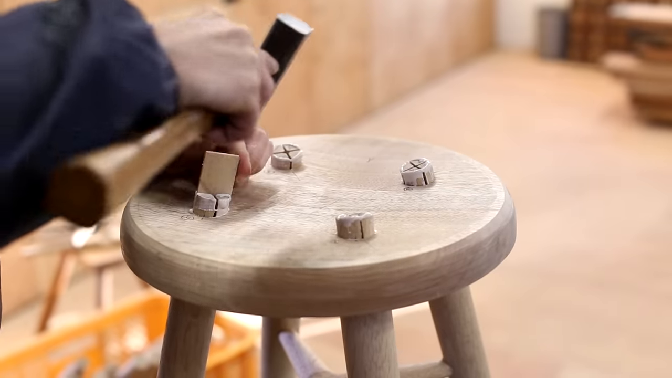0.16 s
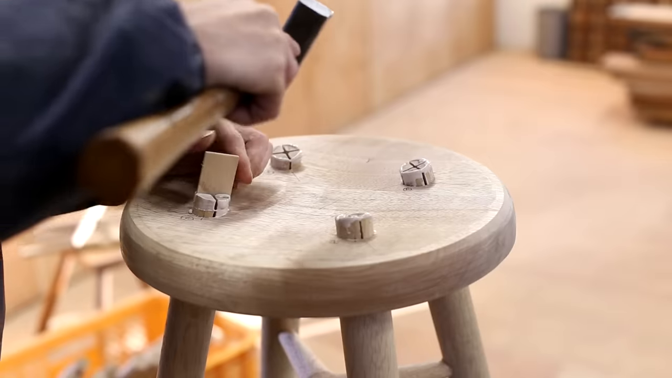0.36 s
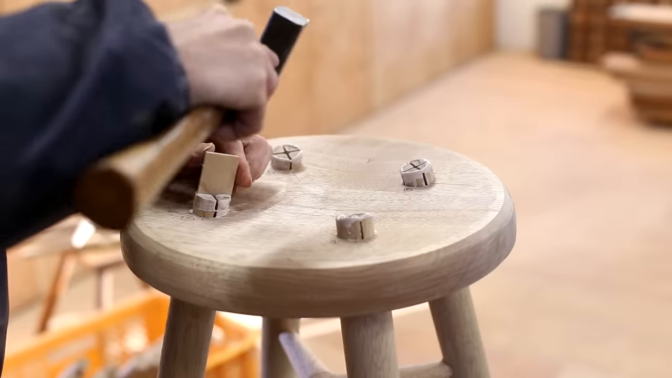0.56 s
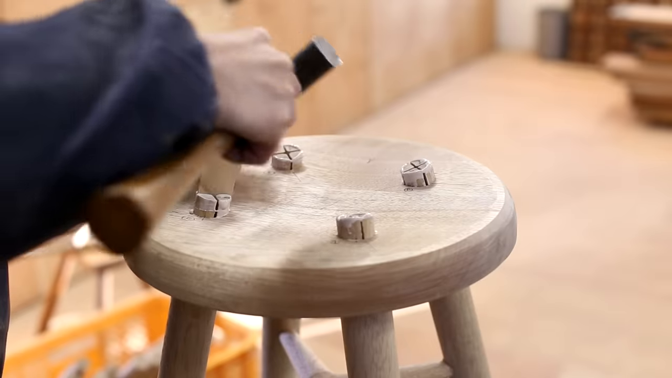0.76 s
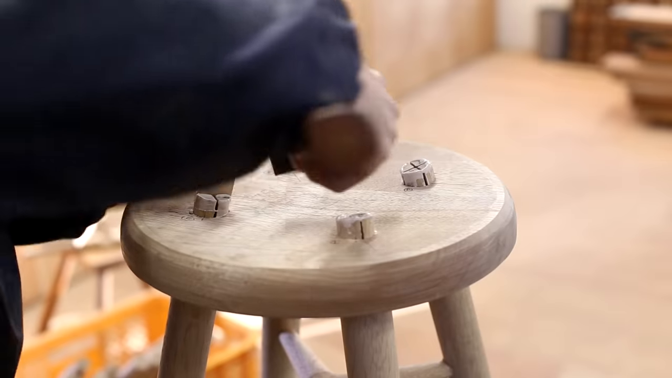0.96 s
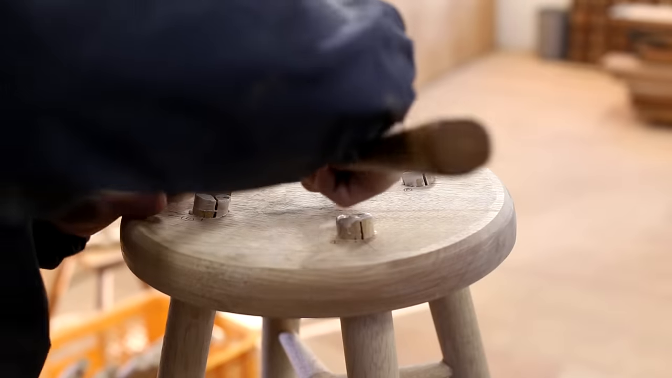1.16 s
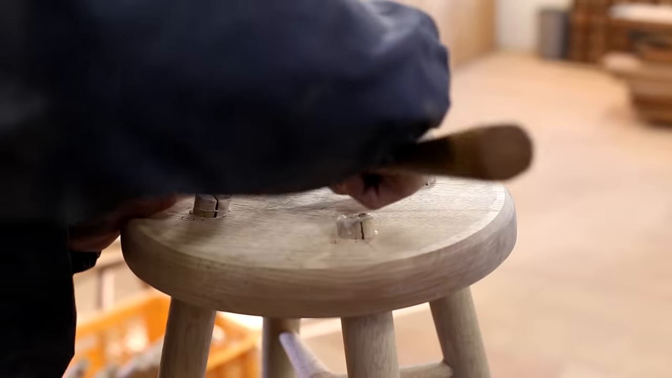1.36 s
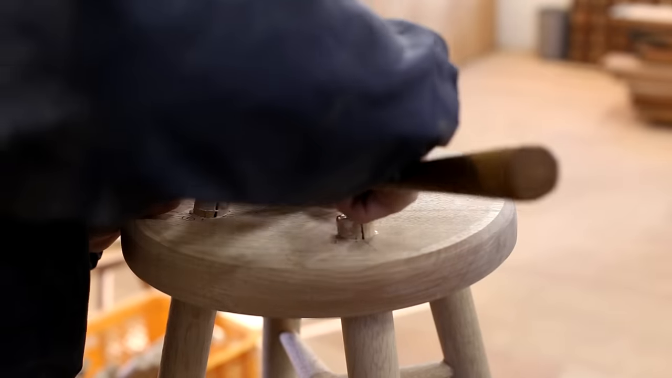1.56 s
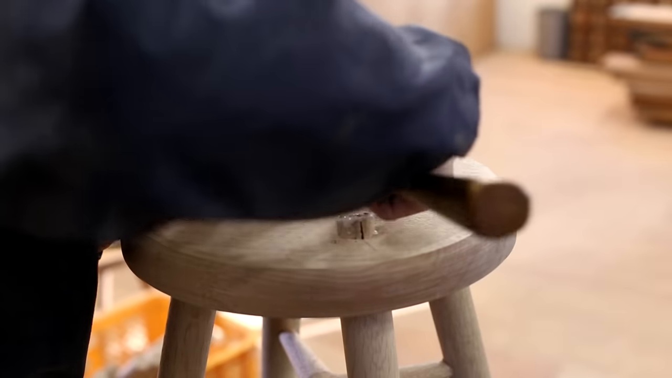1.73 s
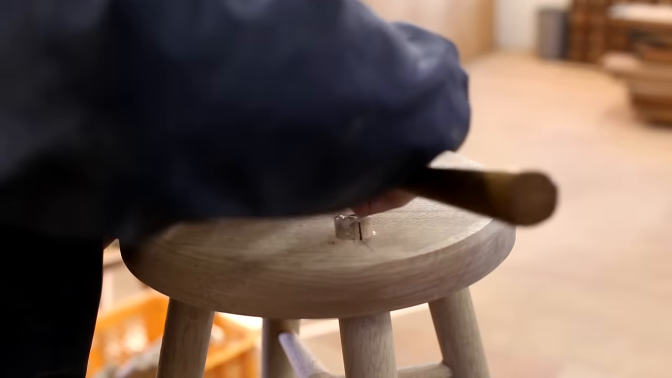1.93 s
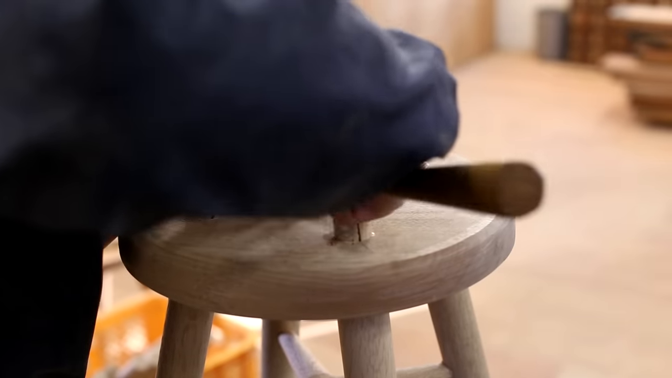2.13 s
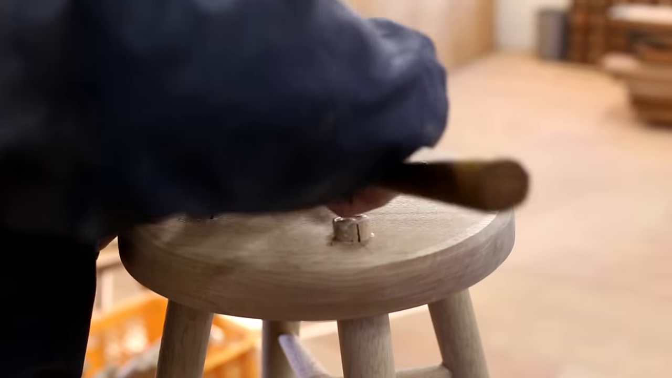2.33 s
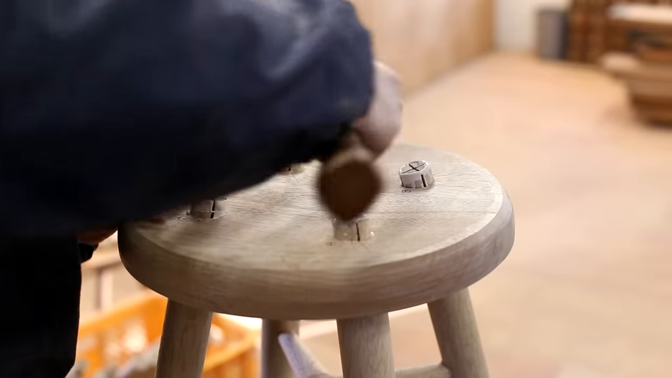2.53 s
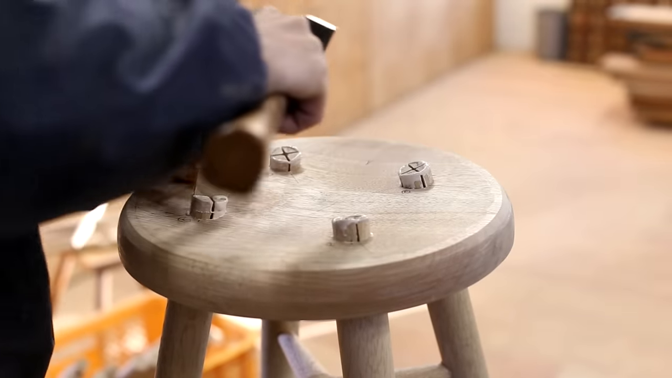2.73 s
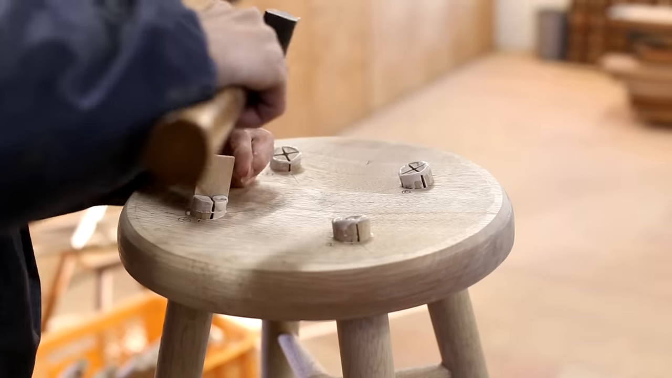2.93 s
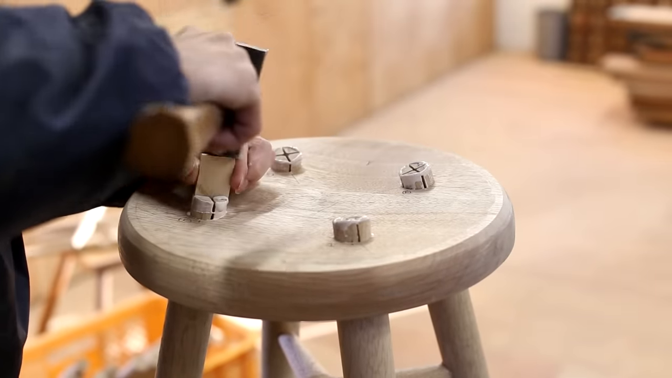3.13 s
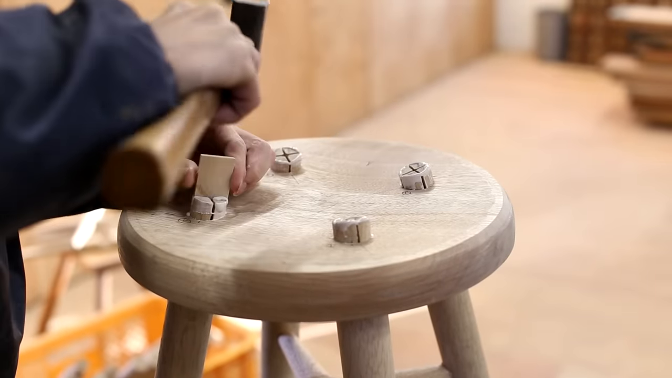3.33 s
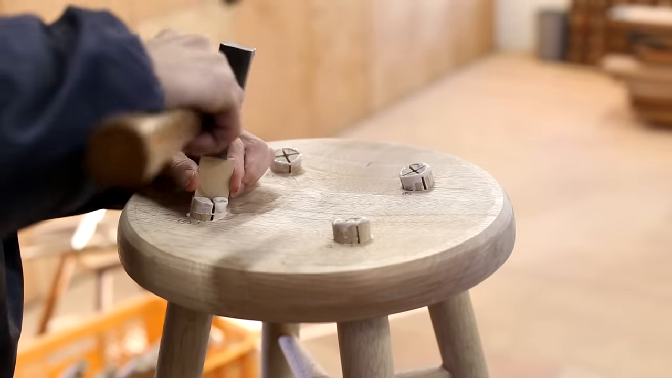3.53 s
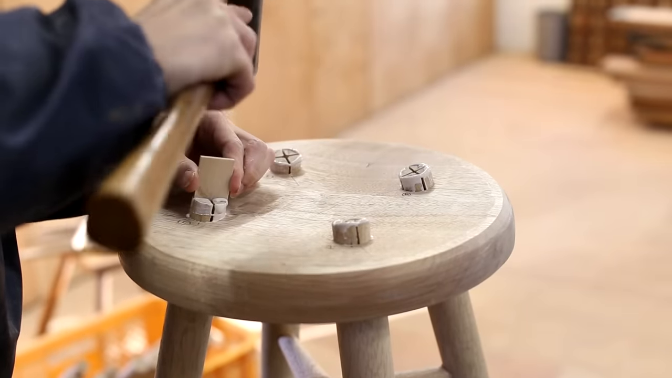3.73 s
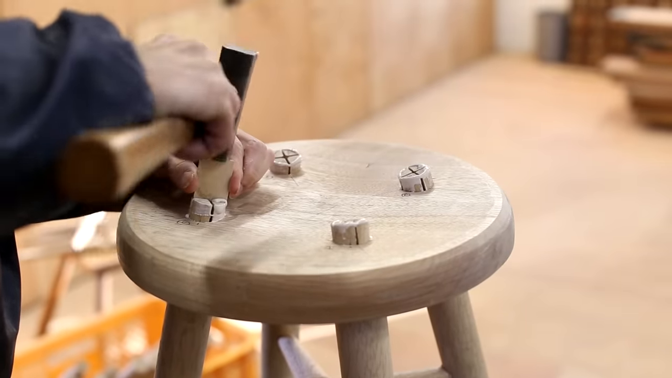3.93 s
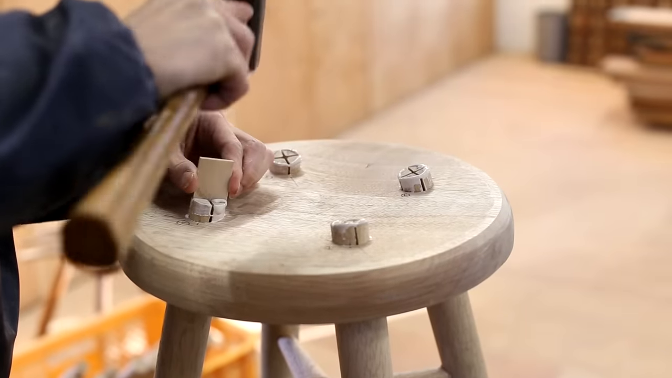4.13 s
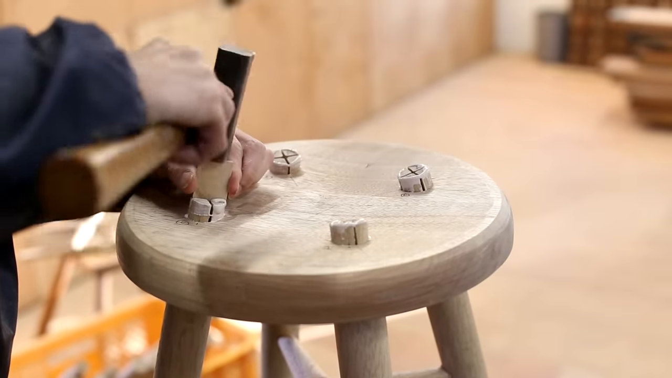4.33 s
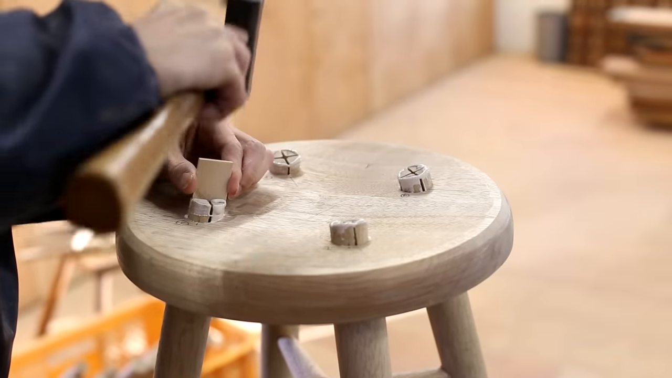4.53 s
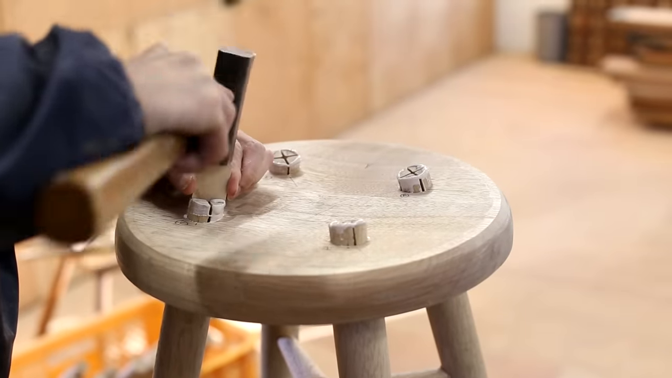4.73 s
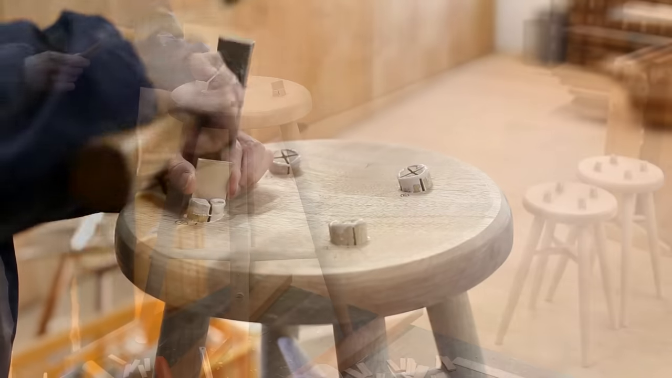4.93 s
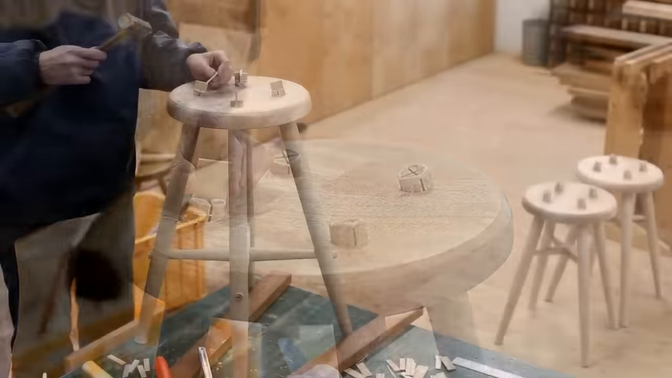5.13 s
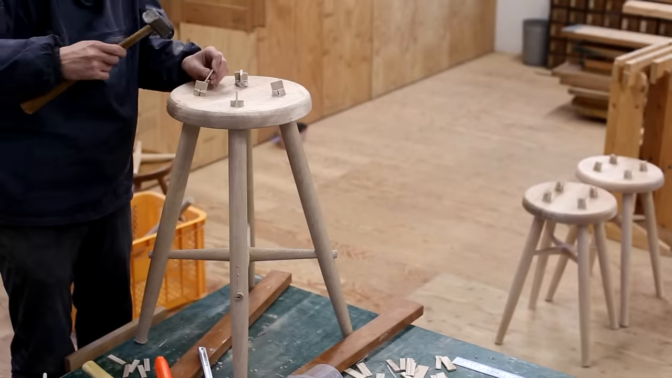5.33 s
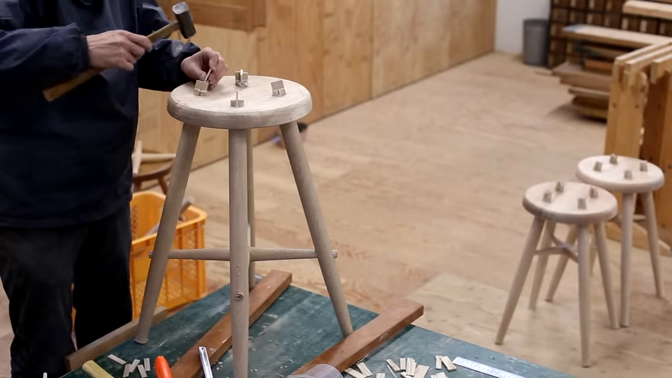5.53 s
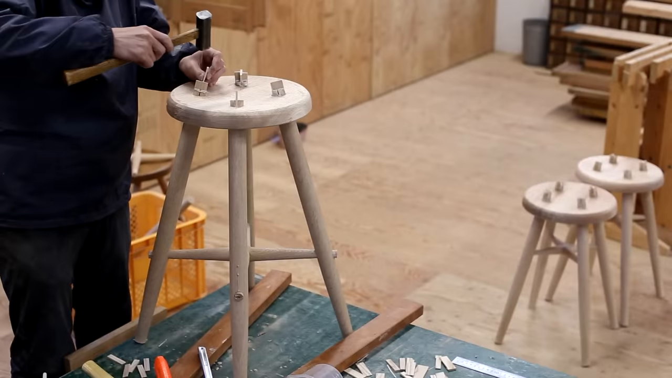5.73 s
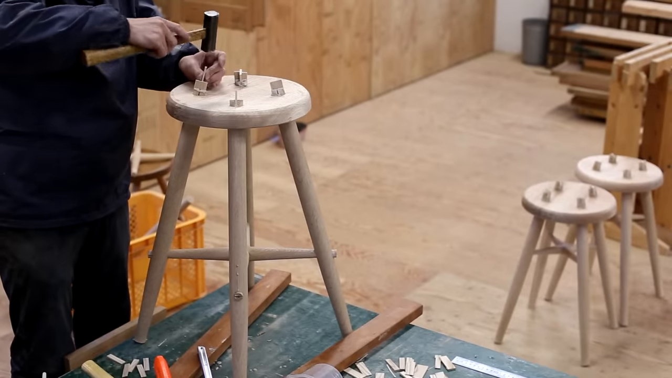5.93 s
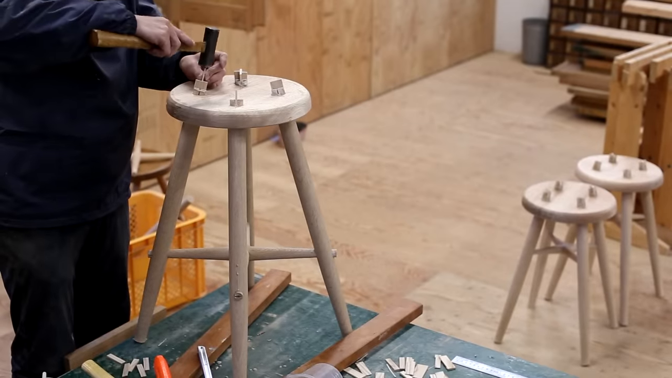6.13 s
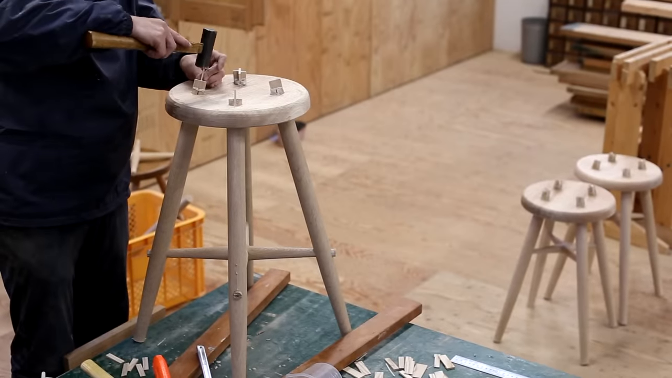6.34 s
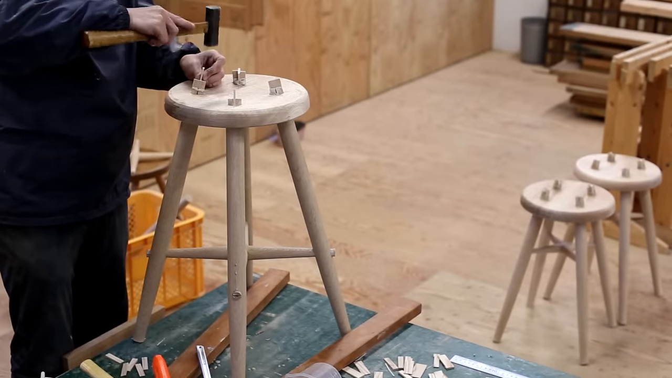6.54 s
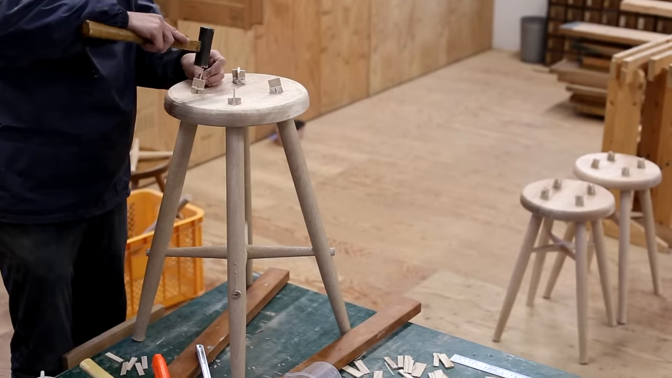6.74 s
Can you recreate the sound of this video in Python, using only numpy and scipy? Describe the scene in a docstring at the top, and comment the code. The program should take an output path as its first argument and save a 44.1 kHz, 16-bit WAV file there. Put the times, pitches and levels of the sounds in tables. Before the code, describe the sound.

In a live workshop, a hammer gives light hollow taps to wooden wedges, then hard spaced cracks on a low stool, then three duller knocks on a taller stool.

```python
"""The last ring of a hard blow dies away in a live workshop, then come faint touches, light taps and hard blows.
A steel hammer drives wooden wedges into a low stool's leg ends, and the sound cross-fades to a taller stool.
Each blow is a set of damped modes, noise bursts for crack and grain, and a room tail with one wall echo.
Filtered noise makes the air and the sleeve's swish; short bright bursts are wedges slipping and handling ticks.
The microphone chain cuts rumble, turns its gain down after loud sound and rounds off the peaks that slip past."""
import sys
import numpy as np
from scipy import signal
from scipy.fft import rfft, irfft, next_fast_len
from scipy.io import wavfile

SR = 44100
rng = np.random.default_rng(int(sys.argv[2]) if len(sys.argv) > 2 else 0)


def write(x):
    x = np.atleast_2d(x).T
    wavfile.write(sys.argv[1], SR, np.round(np.clip(x, -1, 1) * 32767).astype(np.int16))


N = 303849
RING_SIZE = 2 ** 15  # samples that each impact may ring
RING_TIME = np.arange(RING_SIZE, dtype='f') / SR  # s


def amp(db):
    """Decibels as an amplitude factor."""
    return 10 ** (np.asarray(db) / 20)


def decay(t60):
    """A fall of 60 dB in t60 seconds; one row for each t60."""
    rate = np.asarray(np.log(1000) / t60, 'f')[..., None]
    return np.exp(np.maximum(-rate * RING_TIME, -20))


def rise(time_constant):
    """An exponential build-up from nothing towards 1; time constant in seconds."""
    return 1 - decay(time_constant * np.log(1000))


def cut(x, hz, kind, order=2):
    """A causal low-pass or high-pass."""
    cutoff = min(hz, SR / 2 - 1)
    return signal.sosfilt(signal.butter(order, cutoff, kind, fs=SR, output='sos'), x)


def add(track, s, sound):
    """Mix a sound into the track from time s on; what falls outside the track is dropped."""
    start = round(s * SR)
    part = sound[max(-start, 0):N - start]
    track[max(start, 0):][:len(part)] += part


def hiss(spectrum):
    """Steady noise of rms 1 with the given colour."""
    hz, db = np.transpose(spectrum)
    size = next_fast_len(N)
    log_hz = np.log(np.fft.rfftfreq(size, 1 / SR) + 1)
    gain = amp(np.interp(log_hz, np.log(hz), db))
    x = irfft(rfft(rng.standard_normal(size)) * gain, size)[:N]
    return x / x.std()


def banded_noise(centres):
    """White noise split into overlapping bands, one row per band."""
    log_hz = np.log(np.fft.rfftfreq(RING_SIZE, 1 / SR) + 1)
    shares = np.array([np.interp(log_hz, np.log(centres), peak) for peak in np.eye(len(centres))], 'f')
    return irfft(rfft(rng.standard_normal(RING_SIZE, dtype='f')) * shares)


# Colour of the air around each stool. Each row: frequency in Hz, relative noise density in dB per Hz.
LOW_STOOL_AIR = [(20, 9.5), (40, -4), (150, 7), (300, -1), (700, -16.5), (1600, -11.5), (3000, -18.5),
                 (6000, -37), (15000, -30.5)]
TALL_STOOL_AIR = [(15, -23), (25, -9), (123, -10.5), (153, -2), (185, -8.5), (317, -14.5), (575, -12),
                  (1890, -13), (2160, -11.5), (5430, -24.5), (7920, -25), (16000, -27.5)]


def workshop_air(colour, level_db):
    """The steady air at the microphone: coloured noise at one level."""
    return amp(level_db) * hiss(colour)


# The live workshop's diffuse tail. Each row: frequency in Hz, t60 in seconds, relative level in dB.
ROOM = [(59.45, 1, -1.5), (121, 0.45, -0.5), (220, 0.54, 2.5), (485, 0.97, 0), (1100, 0.94, -2),
        (2280, 0.75, -1.5), (4300, 0.63, -7), (5600, 0.36, -12.5), (7440, 0.26, -9.5), (14390, 0.28, -13)]


def reverberation(hz, build_up=0.0043):
    """The envelope of the room's answer to a click in each band: a quick build-up, then a decay."""
    room_hz, t60, db = np.transpose(ROOM)
    t60, db = (np.interp(np.log(hz), np.log(room_hz), column) for column in (t60, db))
    energy = t60 * SR / (2 * np.log(1000))
    return (amp(db) / np.sqrt(energy)).astype('f')[:, None] * decay(t60) * rise(build_up)


def workshop(x, wet_db):
    """A ringing sound together with the room's answer: convolution with a decaying noise tail."""
    hz = [row[0] for row in ROOM]
    tail = (reverberation(hz) * banded_noise(hz)).sum(0)
    return x + amp(wet_db) * signal.fftconvolve(x, tail)[:RING_SIZE]


def wall_echo(x, echo_db=-17, dull_hz=4000):
    """The nearest wall returns one dull copy, late by its longer path to the microphone."""
    delay = round(.0215 * SR)  # 21.5 ms
    late = np.pad(x, (delay, 0))[:len(x)]
    return x + amp(echo_db) * cut(late, dull_hz, 'lowpass')


def swish(start, length):
    """The envelope of one arm movement: attack, hold, release."""
    attack_s, release_s = 0.042, 0.15  # the cloth speeds up, comes to rest
    t = np.arange(N) / SR - start
    return np.clip(np.minimum(t / attack_s, 1 - (t - length) / release_s), 0, 1)


# Arm movements that rub the sleeve. Each row: start in seconds, length in seconds, level in dB.
SWISHES = [(0.746, 2.31, -63), (0.938, 0.21, -57.5), (2.638, 0.25, -60.5)]
# Colour of the jacket cloth. Each row: frequency in Hz, relative noise density in dB per Hz.
CLOTH = [(180, -29), (300, -2.5), (455, -2), (1320, 2.5), (1720, -0.5), (3080, 0), (5430, -8.5),
         (10400, -9.5), (16000, -20.5)]


def sleeve(rustle_db=-68.5, flutter_db=1):
    """Jacket cloth slides over itself with each arm movement, catching a little; rustle_db holds between them."""
    count = N // 600  # one random catch about every 600 samples
    catches = np.interp(np.arange(N), np.linspace(0, N, count), rng.standard_normal(count))
    power = amp(rustle_db) ** 2 + sum((amp(db) * swish(s, length)) ** 2 for s, length, db in SWISHES)
    return np.sqrt(power) * amp(flutter_db * catches) * hiss(CLOTH)


def burst(bands, wet_db):
    """A noisy impact: each band dies at its own speed and hands its energy to the room's diffuse tail."""
    hz, t60, db = np.transpose(bands)
    direct = decay(t60) ** 2
    diffuse = float(amp(wet_db)) ** 2 * direct.sum(1, keepdims=True) * reverberation(hz) ** 2
    return amp(db).astype('f') @ (np.sqrt(direct + diffuse) * banded_noise(hz))


# Short bright rasps as wedges slip under blows, and faint ticks of handling between them.
# Each row: time in seconds, level in dB.
RASPS_AND_TICKS = [(.817, -50), (1.9362, -14.5), (2.2092, -22.5), (2.429, -36.5), (3.052, -51.5),
                   (3.412, -54), (6.198, -29.5), (6.456, -21), (6.768, -14)]
# Colour of these rasps and ticks. Each row: frequency in Hz, t60 in seconds, relative density in dB per Hz.
RASP_BANDS = [(2040, .03, -20), (4620, .03, -17), (5750, 0.013, 5), (7630, 0.017, 4), (9200, 0.026, -10),
              (15000, .03, -40)]


def rasps_and_ticks(start, end, wet_db=3):
    """Bright rasps of slipping wedges and faint handling ticks between two times: short noise bursts with room."""
    out = np.zeros(N)
    for s, db in RASPS_AND_TICKS:
        if start <= s < end:
            add(out, s, amp(db) * burst(RASP_BANDS, wet_db))
    return out


def mode(hz, t60, rise_cycles=0.7, scatter_db=1):
    """One damped mode; low modes take longer to build up, and its level scatters at random."""
    phase = 2 * np.pi * (float(hz) * RING_TIME + rng.random())
    return amp(scatter_db * rng.normal()) * (rise(rise_cycles / hz) * decay(t60) * np.sin(phase))


# A wedge not yet tight. Each row: frequency in Hz, t60 in seconds, relative level in dB.
WEDGE = [(1475, 0.06, -5.5), (1520.5, 0.058, -8.5), (1522, 0.028, -16.5)]


def wedge_ring(level_db, wet_db=-7):
    """A loose wedge rings in a few slowly built modes, heard with the room."""
    ring = sum(amp(db) * mode(hz, t60, rise_cycles=10.0) for hz, t60, db in WEDGE)
    return workshop(amp(level_db) * ring, wet_db)


# Steel meeting end grain. Each row: frequency in Hz, t60 in seconds, relative density in dB per Hz.
CRACK = [(250, 0.0091, 2), (1213, 0.018, -0.5), (1780, 0.02, -13.5), (2650, 0.0066, -4), (3160, 0.027, 1.5),
         (3700, 0.059, -5), (4334, .018, 2.5), (6600, 0.0073, 1.5), (10640, 0.026, -7.5),
         (14900, 0.012, -19.5)]


def steel_crack(strength_db, contact_hz, wet_db):
    """The noisy crack of steel on wood, weaker as the contact softens."""
    hard_contact_hz, db_per_octave = 8600, 10.5  # a square hit; crack lost below it
    crack_db = strength_db + db_per_octave * np.log2(contact_hz / hard_contact_hz)
    return amp(crack_db) * burst(CRACK, wet_db)


def struck_at(place, table):
    """Where the seat is struck decides how strongly each mode answers: rows (Hz, t60 s, dB)."""
    return [(hz, t60, dbs[0] + place * (dbs[-1] - dbs[0])) for hz, t60, *dbs in table]


def seat_and_legs(modes, knock_db):
    """The struck stool's ring: the seat follows the knock, the low modes the legs' thump on the bench."""
    thump_db = -3 + 0.75 * knock_db  # the thump grows more slowly than the blow
    legs_top_hz = 350
    ring = 0
    for hz, t60, db in modes:
        strength_db = thump_db if hz < legs_top_hz else knock_db
        ring = ring + amp(db + strength_db) * mode(hz, t60)
    return ring


def hammering(blows, modes, grain, near_wet_db, spread_time, hard_crack_db,
              far_wet_db=-2.5, ring_wet_db=-2, grain_db=-1):
    """Each contact cracks on the wedge, rings the seat and thumps the legs on the bench."""
    out = np.zeros(N)
    for s, knock_db, contact_hz, wedge_db, place in blows:
        place = np.clip(place, 0, 1)
        wet_db = near_wet_db + place * (far_wet_db - near_wet_db)
        ring = seat_and_legs(struck_at(place, modes), knock_db)
        wood = workshop(ring, wet_db + ring_wet_db)
        wood += amp(knock_db + grain_db) * burst(struck_at(place, grain), wet_db)
        # the blow takes a moment to spread through the stool; a soft contact leaves the high modes quiet
        wood = cut(wood * rise(spread_time), contact_hz, 'lowpass', order=3)
        crack = steel_crack(knock_db + hard_crack_db, contact_hz, wet_db)
        add(out, s, wood + wedge_ring(wedge_db) + crack)
    return wall_echo(cut(out, 85, 'highpass', order=3))


# A faint bump, then blows on the tall stool. Each row: start in seconds, strength in dB.
TALL_CONTACTS = [(5.716, -54), (6.198, -13.5), (6.456, -4.5), (6.768, -1)]
# Its clear modes. Each row: frequency in Hz, t60 in seconds, level in dB relative to the blow.
TALL_MODES = [(114, 0.58, -25), (137.3, 0.069, -4.5), (210.3, 0.13, -11.5), (339.8, 0.18, -18.5),
              (464, 0.74, -35.5), (636, 0.043, -19), (775, 0.041, -18), (1374, 0.046, -12),
              (2000, 0.041, -22), (2760, 0.18, -29.5), (3190, 0.088, -28)]
# Its crowd of weak, close modes. Each row: frequency in Hz, t60 in seconds, relative density in dB per Hz.
TALL_GRAIN = [(151, 0.016, 6.5), (595, 0.22, -11), (1050, 0.091, -12.5), (1540, 0.11, -13.5),
              (2410, 0.089, -19), (3070, 0.11, -6), (3260, 0.069, -30), (3580, 0.074, -5.5),
              (4700, 0.017, -10.5), (15500, 0.084, -12)]


def tall_stool():
    """The taller stool, bumped then hammered; contact and place stay the same throughout."""
    contact_hz, wedge_db = 6540, -32  # contact cut-off; wedge ring relative to the strength
    blows = [(s, db, contact_hz, db + wedge_db, 0) for s, db in TALL_CONTACTS]
    return hammering(blows, TALL_MODES, TALL_GRAIN, near_wet_db=0.06, spread_time=0.004,
                     hard_crack_db=-11.5, ring_wet_db=-7.5)


# The low stool: a hard blow's end, light touches, taps on the far wedge, a dull blow, then hard blows
# nearer the middle. Each row: start in seconds, strength in dB, contact cut-off in Hz, wedge ring in dB,
# place from 0 (near wedge) to 1 (far wedge).
LOW_CONTACTS = [(-.085, 2.5, 9600, -27, 0.68), (.583, -57, 2500, -37, 0.86), (.653, -64, 2500, -43, .7),
                (.817, -47, 3520, -60, 0.82), (1.0, -55, 500, -42, 0.63), (1.306, -17.5, 2330, -6.5, 0.99),
                (1.666, -9, 2600, -5, 0.91), (1.936, -4.5, 3060, -10, .89), (2.209, -6, 2960, -13, 0.94),
                (2.430, -7.5, 2300, -10, 1), (3.183, -3, 1300, -22, 0.94), (3.5565, -2, 7500, -16.5, 0.18),
                (3.944, -2.5, 8500, -19, 0.44), (4.3735, -4.5, 9150, -30, 0.49),
                (4.8395, -6, 9430, -29, 0.46), (5.312, -1, 9200, -20, .6)]
# Its clear modes; the last four rows, near 3 kHz and 4-4.5 kHz, ring in the steel hammer head. Each row:
# frequency in Hz, t60 in seconds, dB relative to a near blow, to a far blow.
LOW_MODES = [(104.5, 0.46, -29, -23.5), (156.3, .2, -29, -26.5), (230.2, 0.15, -31, -15),
             (301, 0.092, -25, -10.5), (357, 0.19, -22, -26), (426, 0.12, -21.5, -23.5),
             (501.4, 0.11, -18, -24.5), (555.2, 0.19, -20.5, -28), (668, 0.085, -23, -18),
             (766, 0.088, -13.5, -23.5), (904.4, 0.16, -11.5, -20), (1130, 0.031, -20, -38),
             (1234, 0.12, -25, -28.5), (1357, 0.18, -14, -29.5), (1475, 0.12, -22, -29.5),
             (1740, 0.098, -12.5, -24.5), (1821, 0.13, -37.5, -17), (2309, 0.14, -42, -27),
             (2990, 0.24, -37.5, -39.5), (2970, 0.11, -27, -42.5), (4050, 0.054, -17.5, -40),
             (4450, 0.073, -25.5, -40)]
# Its weak, close modes. Each row: frequency in Hz, t60 in seconds, relative dB per Hz struck near, struck far.
LOW_GRAIN = [(166, 0.17, -19, -0.5), (261, 0.073, 8, -2), (505, 0.22, 3, -4.5), (820, 0.099, 8.5, -2),
             (1280, 0.051, 10.5, -1.5), (1842, 0.085, 5.5, -8), (2347, 0.042, -11.5, 4),
             (2920, 0.026, 6, -9.5), (2940, 0.04, 15, -0.5), (3243, 0.12, -25.5, -4), (4220, 0.06, 2, 0),
             (5100, 0.06, -17, 2), (7850, 0.015, -23.5, -12), (15000, 0.033, -17, -27)]


def low_stool():
    """The low stool touched, tapped and hammered anywhere between its near and far wedge."""
    return hammering(LOW_CONTACTS, LOW_MODES, LOW_GRAIN, near_wet_db=1.0, spread_time=0.0012,
                     hard_crack_db=-0.5)


def gain_control(x, threshold_db=-15, slope=0.97, attack=0.003, release_db=30):
    """The gain drops within milliseconds of a loud sound and returns at release_db a second."""
    pole = np.exp(-1 / (attack * SR))
    level_db = 10 * np.log10(signal.lfilter([1 - pole], [1, -pole], x ** 2) + 1e-12)
    # a running maximum on a rising ramp gives a held peak that falls at the release speed
    ramp = release_db * np.arange(N) / SR
    over_db = np.maximum.accumulate(np.maximum(level_db - threshold_db, 0) + ramp) - ramp
    reduction_db = min(slope, 1) * signal.lfilter([1 - pole], [1, -pole], over_db)
    return x * amp(-reduction_db)


def microphone(x, drive_db=2):
    """A rumble filter, gain control, then rounded clipping of the peaks that slip past it."""
    x = gain_control(cut(x, 30, 'highpass') * amp(drive_db))
    ceiling = .58
    return x / (1 + (x / ceiling) ** 6) ** (1 / 6)


# The cross-fade between the stools. Each row: time in seconds, gain of the low stool's sound.
FADE = [(4.9, 1), (5.15, 0.75), (5.31, 0.17), (5.4, 0)]


def scene():
    """The low stool fades out while the tall stool fades in, each through its own microphone chain."""
    change = FADE[-1][0]
    low = low_stool() + rasps_and_ticks(0, change) + sleeve() + workshop_air(LOW_STOOL_AIR, -63.5)
    tall = tall_stool() + rasps_and_ticks(change, N / SR) + workshop_air(TALL_STOOL_AIR, -62)
    fade = np.clip(np.interp(np.arange(N) / SR, *np.transpose(FADE)), 0, 1)
    return (fade * microphone(low) + (1 - fade) ** 2 * microphone(tall))[None]


def record(dry):
    """The recorder's band limit: the treble rolls off steeply around top_hz."""
    top_hz = 16200
    size = next_fast_len(N + 8192)
    band = np.clip((top_hz - np.fft.rfftfreq(size, 1 / SR)) / 1000 + .5, 0, 1) ** 2
    return irfft(rfft(dry, size) * band, size)[:, :N]


dry = scene()
out = record(dry)
write(out)
```